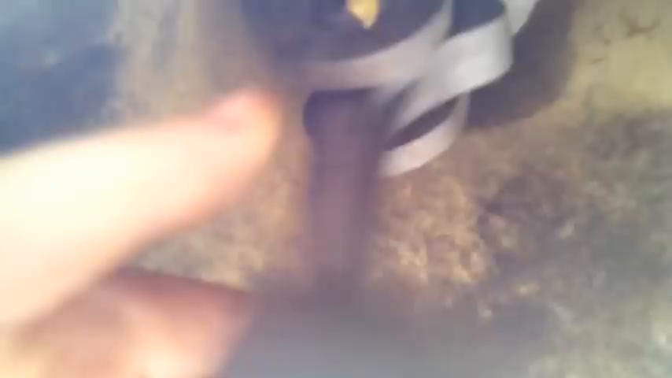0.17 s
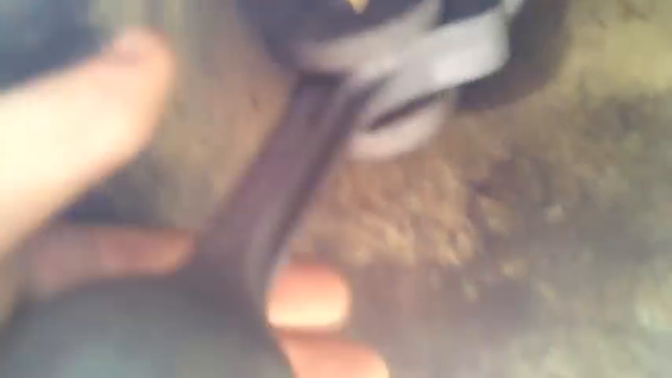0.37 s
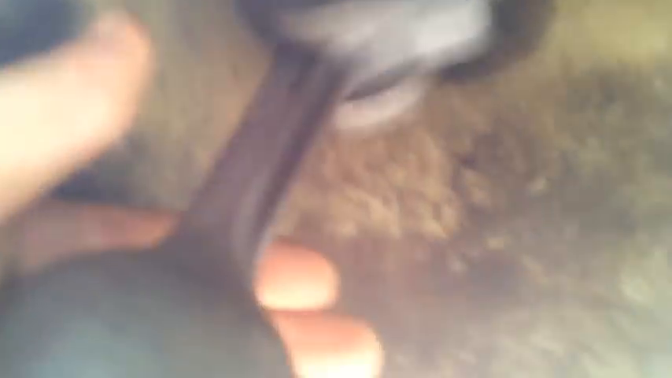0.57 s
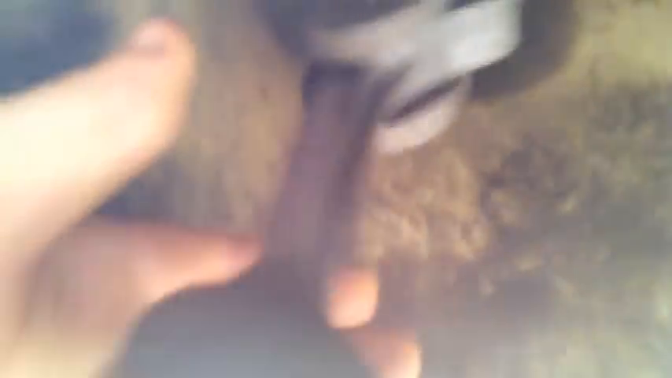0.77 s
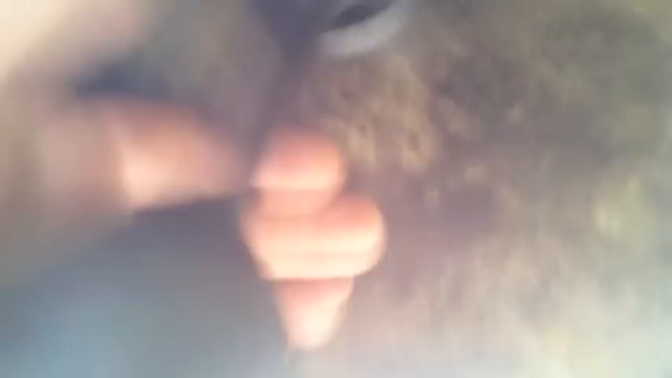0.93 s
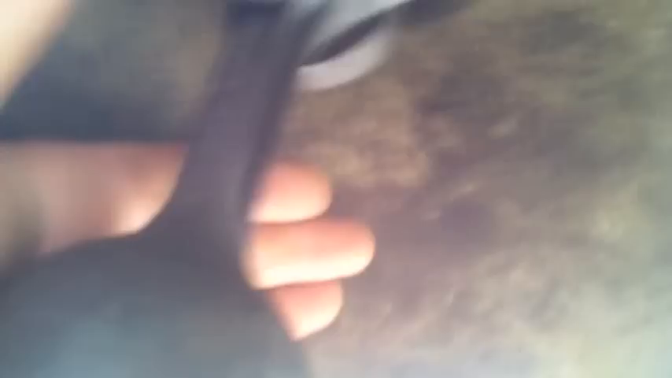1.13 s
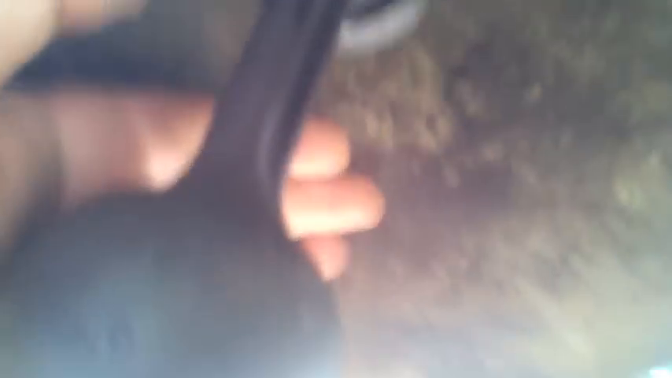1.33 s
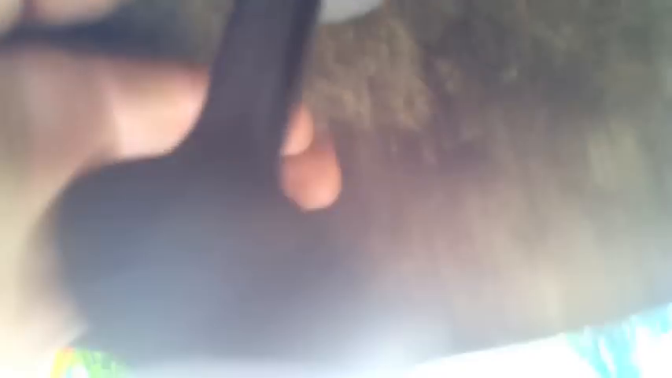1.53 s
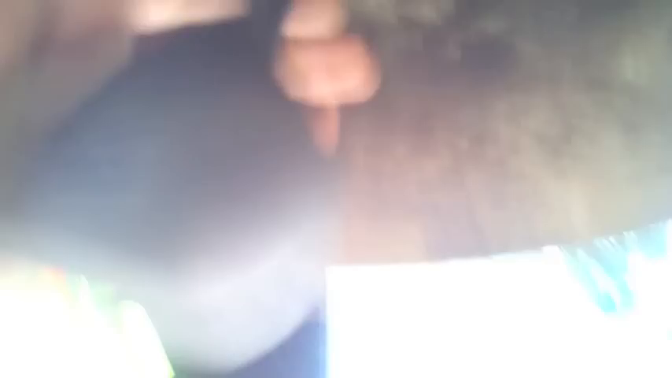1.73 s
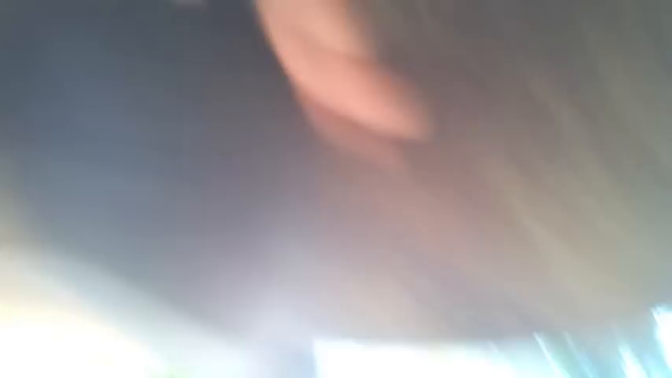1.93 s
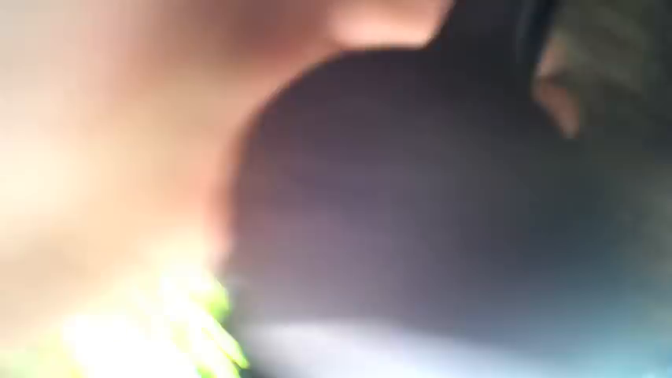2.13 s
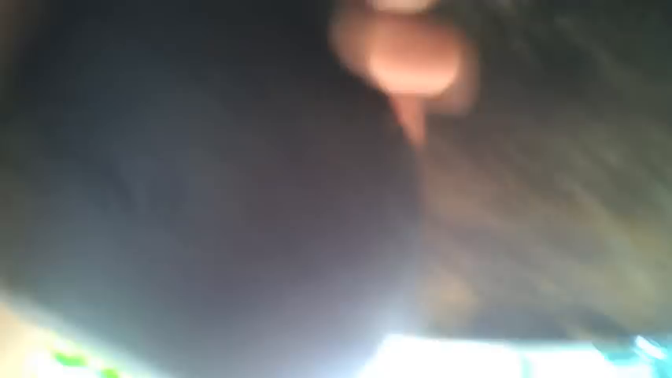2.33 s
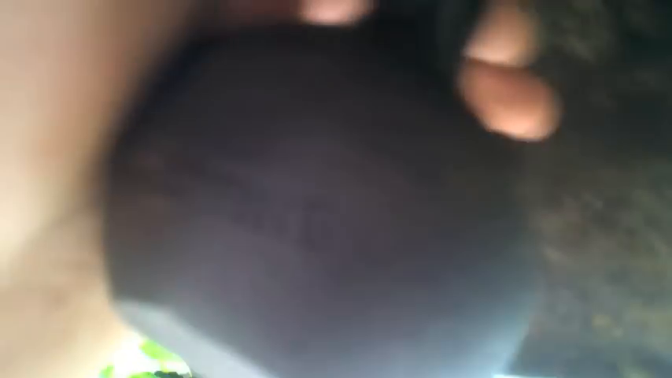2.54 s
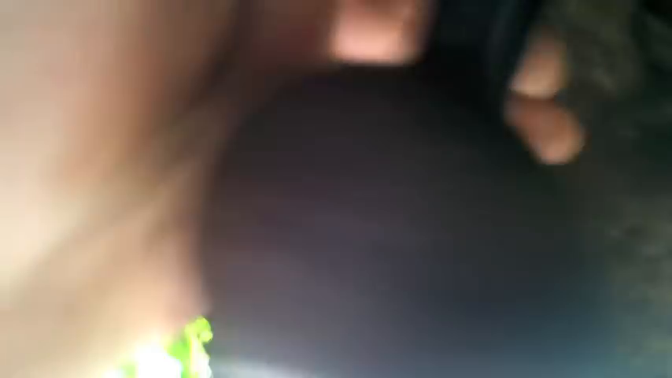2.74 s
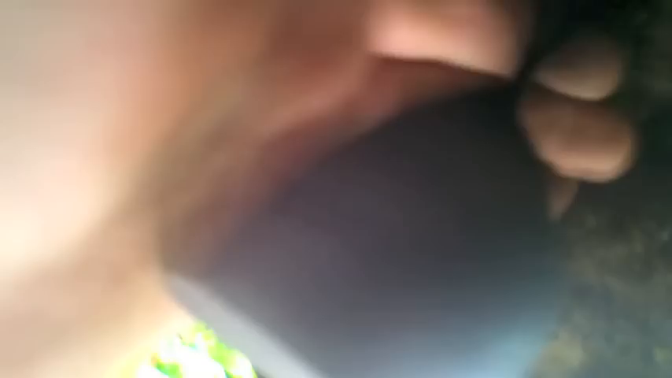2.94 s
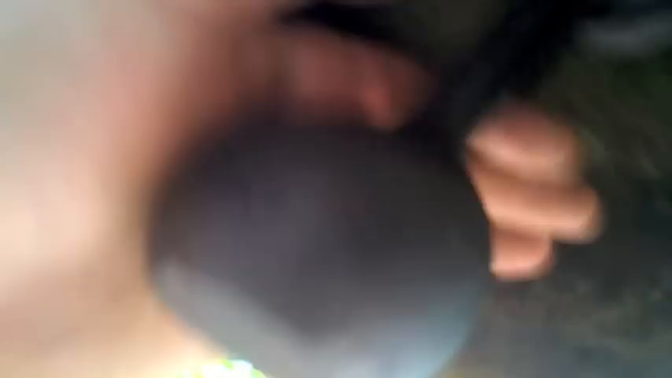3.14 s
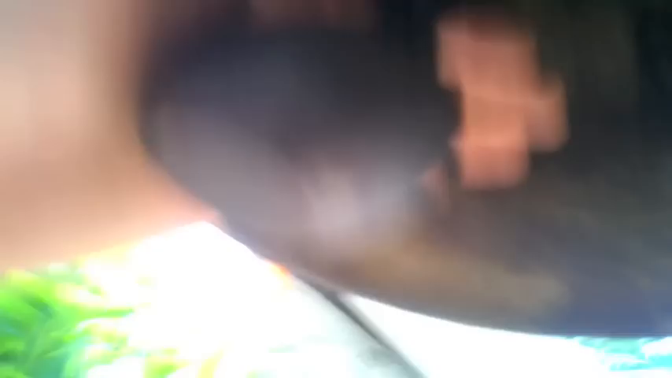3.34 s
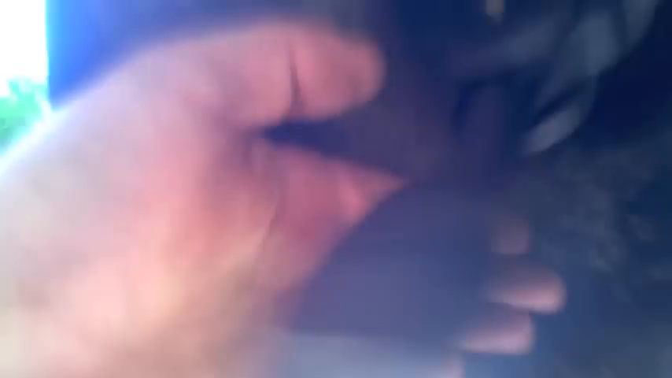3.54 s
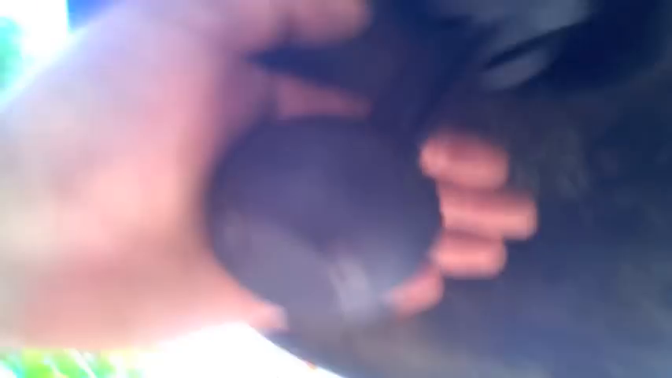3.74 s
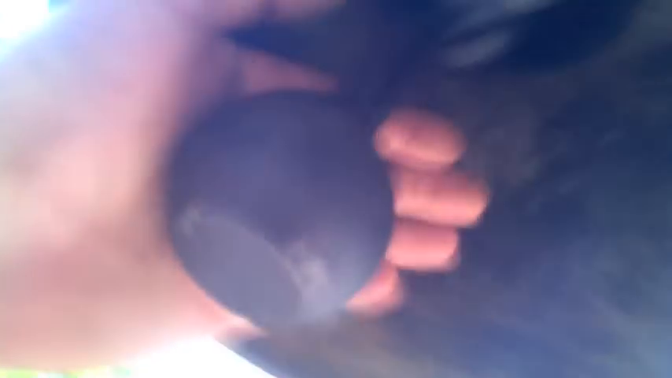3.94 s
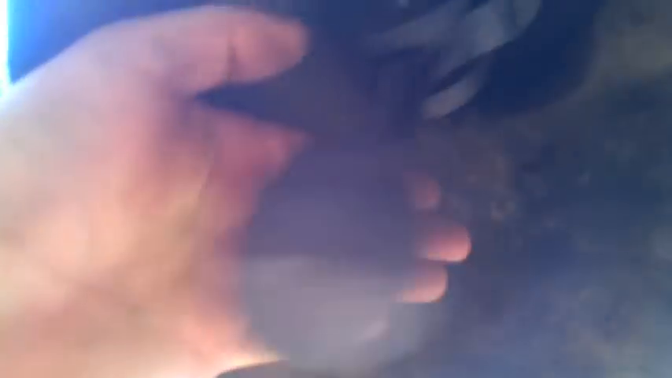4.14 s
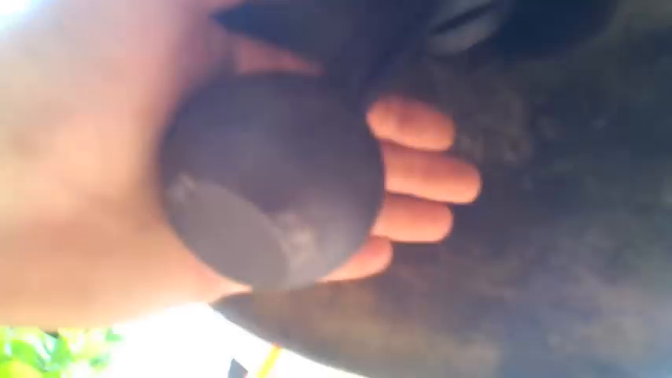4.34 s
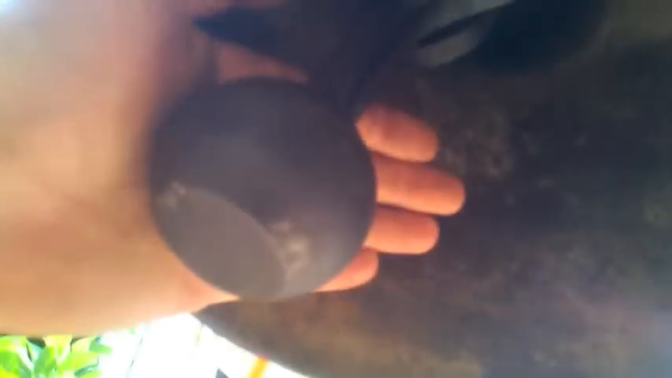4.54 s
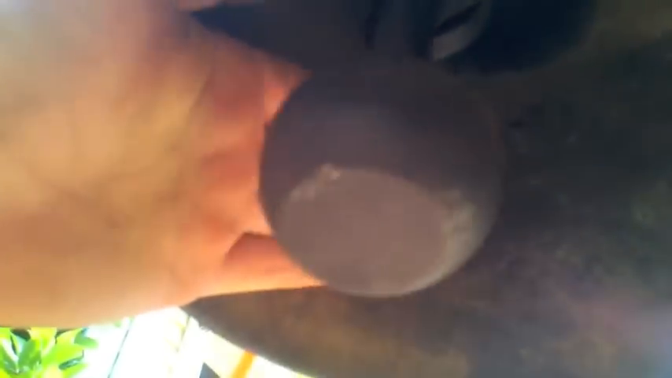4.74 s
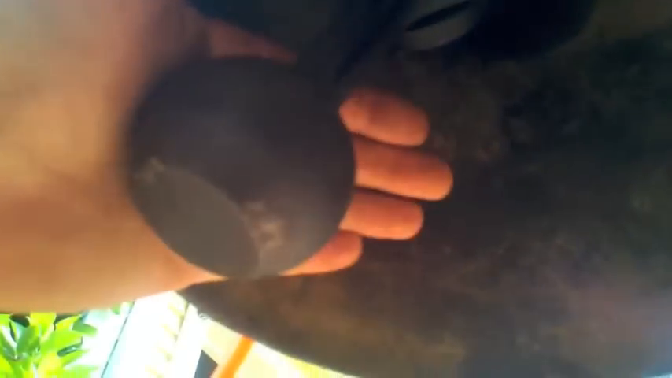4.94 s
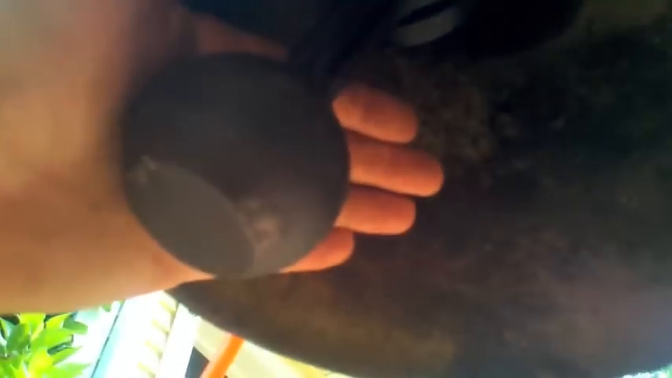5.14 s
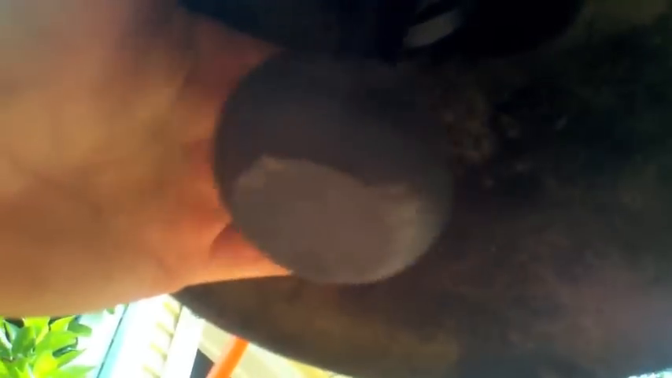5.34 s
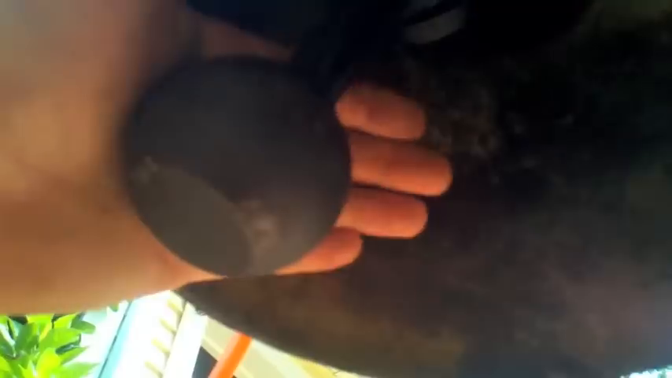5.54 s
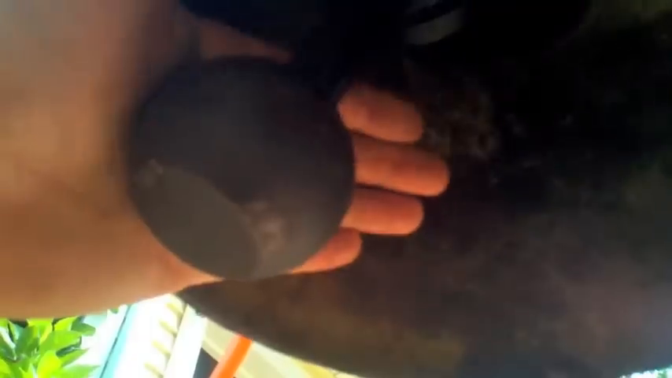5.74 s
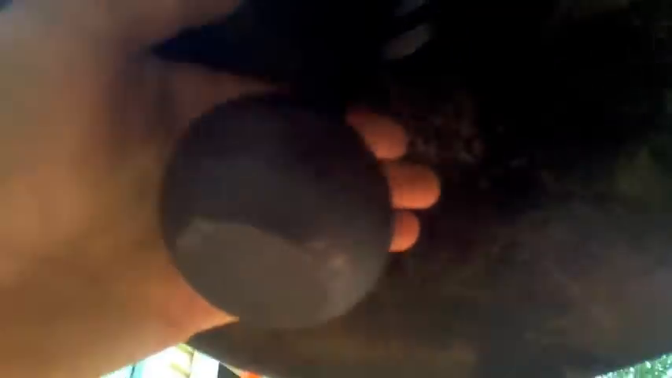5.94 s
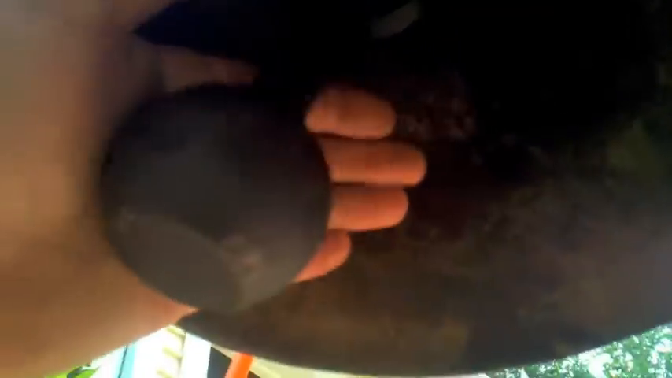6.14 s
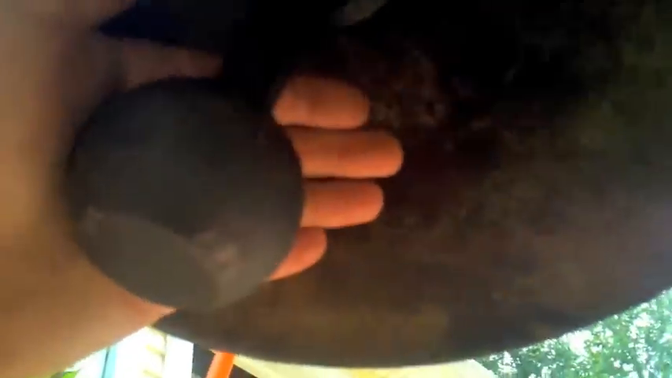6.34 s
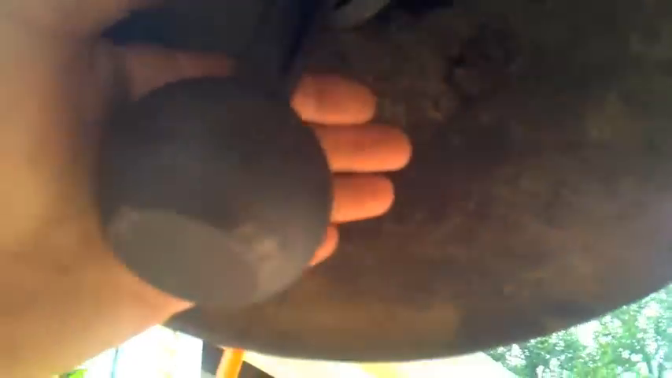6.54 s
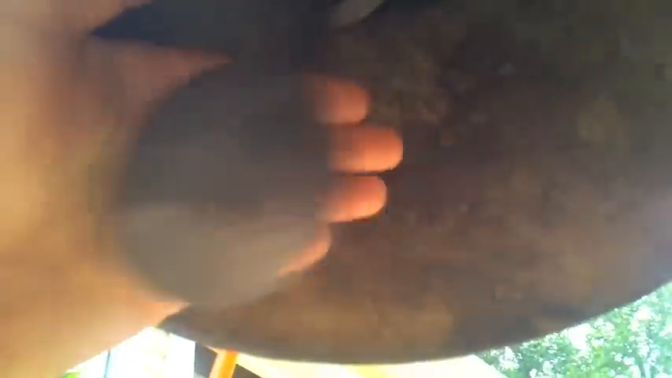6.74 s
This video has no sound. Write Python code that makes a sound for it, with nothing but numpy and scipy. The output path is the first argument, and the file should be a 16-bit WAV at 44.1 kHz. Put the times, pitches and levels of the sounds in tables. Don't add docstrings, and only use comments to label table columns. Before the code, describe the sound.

Regular bright steel clanks about every two-thirds of a second, with lighter rebounds and puffs of air, the bell held silent while a compressor hums behind.

```python
import sys
import numpy as np
from scipy import signal
from scipy.fft import rfft, irfft
from scipy.io import wavfile
from scipy.ndimage import uniform_filter1d, map_coordinates

SR = 44100
rng = np.random.default_rng(int(sys.argv[2]) if len(sys.argv) > 2 else 0)


def ratio(d):
    e = np.asarray(d, float) / 20
    return 10 ** e


def generate_wav(signal):
    frames = np.transpose(np.atleast_2d(signal))
    scaled = np.clip(frames, -1, 1) * 32767
    pcm = np.round(scaled).astype(np.int16)
    wavfile.write(sys.argv[1], SR, pcm)


N = 304284


def drift(rate):
    knots = rng.standard_normal(200)
    return map_coordinates(knots, [np.arange(N) / SR * rate + 3], order=3)


def curve(rows):
    return np.interp(np.arange(N) / SR, *np.transpose(rows))


def add(track, times, pieces):
    for s, piece in zip(times, pieces):
        i = round(s * SR)
        lead = max(-i, 0)
        track[..., i + lead:i + piece.shape[-1]] += piece[..., lead:N - i]


def ports(alike, opposed):
    return np.array([alike + opposed, alike - opposed])


def port_noise(spectrum):
    hz, *levels_db = np.transpose(spectrum)
    grid = np.log(np.fft.rfftfreq(N, 1 / SR) + 1)
    gains = ratio(np.array([np.interp(grid, np.log(hz), db) for db in levels_db]))
    noise = irfft(gains * rfft(rng.standard_normal((2, N))), N)
    pair = ports(*noise)
    return pair / np.std(pair)


# time in seconds, depth [0-1].
MIC_DEPTH = [
    (0, 0.13),
    (2, 0),
    (3.5, 0.31),
    (5.4, .72),
    (6.9, 0.8),
]


def depth_at(s):
    return np.interp(s, *np.transpose(MIC_DEPTH))


def parts(events, table):
    s, force_db = np.transpose(events)[:2]
    rim_db, change_db = np.transpose(table)
    return force_db + rim_db[:, None] + np.outer(change_db, depth_at(s))


def resonate(contacts, hz, width):
    r, w = np.exp(-np.pi * width / SR), 2 * np.pi * hz / SR
    return signal.lfilter([1 - r, 0, r - 1], [1, -2 * r * np.cos(w), r * r], contacts)


def clank(times, levels_db, body, rise, hold, t60, tail_db, tail_t60, habit=0.56, far_db=-9, alike=False, shared=0):
    t = np.arange(round(.2 * SR)) / SR
    fall = ratio(-60 * np.maximum(t - hold, 0) / t60) + ratio(tail_db - 60 * t / tail_t60)
    shape = np.clip(t / rise, 0, 1) ** 2 * fall
    count = len(times) + 1
    uneven_db = 2.5 * rng.standard_normal((count, 2, len(t) // 30)).repeat(30, -1)
    draws = rng.standard_normal((count, 2, len(t))) * ratio(uneven_db)
    contacts = (np.sqrt(habit) * draws[0] + np.sqrt(1 - habit) * draws[1:]) * shape
    strengths = ratio(1.59 * rng.standard_normal((len(times), len(body))))
    pieces = 0
    for k, (hz, width, db) in enumerate(body):
        rung = resonate(contacts, hz, width)
        pieces = pieces + (-1) ** k * ratio(db) * strengths[:, k, None, None] * rung
    pieces /= np.sqrt(np.mean(pieces[..., :550] ** 2, axis=-1, keepdims=True))
    if alike:
        pieces, far_db = pieces[:, [0, 0]], 0
    pieces = pieces * ratio(np.add.outer(levels_db, [0, far_db]))[..., None]
    out = np.zeros((2, N))
    add(out, times, pieces + shared * pieces[:, [0]] * [[0], [1]])
    return out


# level alike at both ports in dB,
# level opposed between the ports in dB, level alike under load in dB.
DRONE = [(-62, -82, -65), (-52, -80, -55.5), (-53.5, -104, -58), (-61, -106, -92), (-55, -167, -56),
         (-69.5, -109, -56.5), (-54, -133, -51.5), (-77, -73, -64), (-58, -117, -59), (-62, -57, -62),
         (-64.5, -72.5, -63.5), (-72, -114, -79), (-64, -103, -67.5), (-73, -94, -62), (-71, -85, -73.5),
         (-57, -69.5, -57.5), (-69, -89, -65.5), (-70.5, -75, -65), (-83.5, -82, -73), (-114, -109, -94),
         (-84, -93, -85), (-92, -83, -71), (-75.5, -85, -79), (-75.5, -80, -79), (-87, -82, -73),
         (-103, -76, -81), (-70.5, -83, -84), (-84, -85, -72), (-73.5, -85, -76), (-60.5, -69, -64)]
# time in seconds, strokes per second [Hz].
STROKES = [
    (0, 44.87),
    (.7, 44.89),
    (1.5, 44.8),
    (2.7, 44.74),
    (3.0, 44.38),
    (3.4, 44.44),
    (3.75, 44.7),
    (5.1, 44.82),
    (6.9, 44.79),
]
# time in seconds, share [0-1].
LOAD = [
    (0, 0.06),
    (2.8, 0.8),
    (3.05, 0.99),
    (3.45, 1),
    (3.65, 0.31),
    (6.9, 0.5),
]
# pitch in Hz, change in dB.
SETTLED = [(400, 1), (520, 4.5), (630, 0), (760, 1.5), (806, -2), (850, 2.5), (895, 14), (1000, 5)]
# time in seconds, level in dB.
WHINE = [
    (0, -0.5),
    (.8, 3.5),
    (1.9, -0.5),
    (2.7, -5),
    (3.9, -10),
    (4.5, -4),
    (6.9, -5),
]
# pitch in Hz, level alike at both ports in dB, level opposed in dB.
MURMUR = [(40, -2, -6), (109, -0.5, -31.5), (383, -4, -2.5), (800, -19.5, -47), (1420, -10.5, -15),
          (1900, -16.5, -12.5), (3120, -16, -18), (4430, -25.5, -25), (5370, -23.5, -28.5),
          (8700, -22, -19), (13850, -17.5, -16.5), (13400, -44, -50)]


def compressor():
    phase, load = 2 * np.pi * np.cumsum(curve(STROKES)) / SR, np.clip(curve(LOAD), 0, 1)
    settled = curve([(3.45, 0), (3.84, 1)])
    out = 0
    for k, (alike_db, opposed_db, loaded_db) in enumerate(DRONE, start=2):
        start, skew = rng.standard_normal(2)
        turn = k * phase + 1.1 * start + .15 * drift(6)
        level_db = alike_db + load * (loaded_db - alike_db)
        level_db = level_db + settled * np.interp(k * STROKES[0][1], *np.transpose(SETTLED))
        if k > len(DRONE):
            level_db = level_db + curve(WHINE)
        alike = ratio(level_db) * np.cos(turn)
        opposed = ratio(opposed_db) * np.sin(turn + 1.9 * skew)
        out = out + ratio(0.33 * drift(2.17) + 0.55 * drift(0.46)) * ports(alike, opposed)
    throb = ratio(0.28 * np.cos(phase) + 0.4 * np.cos(2 * phase) + 0.067 * drift(5.9))
    return out + ratio(-53.5) * throb * port_noise(MURMUR)


# pitch in Hz, level alike at both ports in dB, level opposed in dB.
LEAK = [(3000, -12, -33), (7240, -11, -36), (8700, -29, -28), (10060, 8, -40), (11200, 1, 1),
        (13400, 13, 4)]
# pitch in Hz, level alike at both ports in dB, level opposed in dB.
EXHAUST = [(1080, -4.5, -23), (3220, 5.5, 8), (4000, -16, -10), (6500, -2.5, 3), (7870, 16, 4),
           (9100, 3.5, 1), (13600, -5.5, -1)]


def air():
    early_blow_s, early_release_s, early_leak_db = -.397, -.237, -41
    t = np.arange(N) / SR
    blown = np.r_[early_blow_s, np.array(BLOWS)[:, 0]]
    freed = np.r_[early_release_s, np.array(RELEASES)[:, 0]]
    last = np.searchsorted(freed, t) - 1
    since_blow = t - blown[np.searchsorted(blown, t) - 1]
    since_free = t - freed[last]
    vented = uniform_filter1d((since_free < since_blow) * 1., 300)
    puff_db = np.r_[0, np.array(RELEASES)[:, 1]][last] - 44.5 - 60 * since_free / 1.08
    rest_s, sag_s = 0.14, 0.07
    late = since_free - rest_s
    sag_db = np.where(late < 0, -late / rest_s, 6 * np.expm1(-late / sag_s))
    leak_db = np.r_[early_leak_db, np.array(RELEASES)[:, 2]][last] + sag_db + 0.8 + 1.1 * drift(7.9)
    leak = sum(ratio(0.85 * drift(12) - 4.0) * port_noise(LEAK) for gap in range(2))
    return vented * (ratio(puff_db) * port_noise(EXHAUST) + ratio(leak_db) * leak)


STEEL_HZ = [2089, 3585, 3808, 5176, 5618, 5735, 5886, 6098, 7456, 7665, 8608, 9075, 9398, 9468, 9771, 9995,
            10977, 12010, 12225, 12441, 13033, 13146]
# strength in dB, time to fall by 60 dB in seconds.
STEEL = [(-55.5, 0.79), (-41.5, 2.43), (-51, 0.69), (-52, 0.25), (-60, 0.55), (-48, 0.78), (-24.5, 0.24),
         (-37, 4.9), (-50, 1.6), (-20.5, 0.54), (-40, 0.11), (-45.5, 1.2), (-51, 0.26), (-38.5, 1.3),
         (-62, 0.46), (-65, 1), (-41.5, 0.99), (-35, 0.67), (-46, 0.54), (-41, 0.58), (-58, 0.35),
         (-48, 1.9)]
RING_HZ = [3585, 6000, 7666, 9430, 12010]
# level at the rim in dB, change at full depth in dB.
RING_PARTS = [
    (-3, -11),
    (-5, -7.5),
    (1.5, -2.2),
    (-2.5, -8),
]
# pitch in Hz, change in dB.
RELEASE_DAMP = [(5000, -16), (6100, -4), (7600, -18), (9400, -2), (12000, -20)]


def steel():
    t = np.arange(round(.9 * SR)) / SR
    struck = np.array([(-0.26, 0, 0, 0, 0)] + list(BLOWS))
    rows = np.c_[struck[:, 0] + .001, struck[:, 3], parts(struck, RING_PARTS).T]
    pushes_db = np.r_[3, np.transpose(RELEASES)[3]]
    bounced, released = np.clip((t - .071) / .008, 0, 1), np.clip((t - .16) / .02, 0, 1)
    free_s = np.maximum(t - .16, 0)
    onset = np.clip(t / 0.035, 0, 1)
    chance = rng.standard_normal((len(rows), len(STEEL), 3))
    pieces = np.zeros((len(rows), 2, len(t)))
    for k, (hz, (db, t60)) in enumerate(zip(STEEL_HZ, STEEL)):
        if hz < 4000:
            decay_db = -60 * t / t60 - 45 * free_s
        else:
            damp_db = np.interp(hz, *np.transpose(RELEASE_DAMP))
            decay_db = -60 * t / t60 - 6 * bounced - 100 * free_s + damp_db * released
        swing = ratio(db + decay_db) * onset * np.exp(2j * np.pi * hz * t)
        anchored = min(abs(hz - np.array(RING_HZ))) < 120
        luck_db = .6 if anchored else 3.5
        for row, piece, (luck, near, far), push_db in zip(rows, pieces, chance[:, k], pushes_db):
            share_db = np.interp(hz, RING_HZ, row[1:]) + luck_db * luck
            if hz == RING_HZ[0]:
                grip_db = 70 * depth_at(row[0]) * np.maximum(t - 0.25, 0)
                share_db = share_db + bounced + push_db * released - grip_db
            turns = [np.exp(9j * near), 0.36 * np.exp(9j * near + 1j * far)]
            piece += ratio(share_db) * np.real(np.outer(turns, swing))
    out = np.zeros((2, N))
    add(out, rows[:, 0], pieces)
    return out


def ticks():
    s = np.transpose(BLOWS)[0] - .009
    level_db = -38.5 + 9 * rng.standard_normal(len(s))
    return clank(s, level_db, RELEASE_BODY[2][2:], 0.00029, 0.0011, 0.039, -18, 0.064)


# pitch in Hz, width in Hz, level in dB.
HOLLOW = [(385, 35.5, 14.5), (534, 79, -2.5)]


def piston(events, levels, body, rise, hold, t60, tail_db):
    hollow_db, clack_db, clink_db, crack_db = parts(events, levels)
    clack, clink, crack = body
    s = np.transpose(events)[0] - 0.45 * rise
    return (clank(s, hollow_db - 2.5, HOLLOW, rise, hold, t60, -28, 0.046, alike=True)
            + clank(s, clack_db, clack, rise, hold + 0.00079, t60, tail_db + 47, 0.087)
            + clank(s, clink_db - 2.5, clink, rise, hold, t60, tail_db, 0.047)
            + clank(s, crack_db, crack, rise, hold, t60, tail_db - 4, 0.092))


# start in seconds, force in dB, level of the leak that follows in dB,
# push given to the low ring in dB.
RELEASES = [(0.4104, -0.5, -37, 6), (1.0609, 0, -38, 4.5), (1.7059, -1.5, -43, 5),
            (2.354, -1.5, -43.5, -1.5), (3.0044, -1, -43, -6.5), (3.6485, -0.5, -41, -1.5),
            (4.2946, -2, -42, 3), (4.943, -1, -42.5, 2), (5.5921, -1.5, -43.5, 3.2), (6.2407, -2.5, -42, 7),
            (6.8867, -1, -41, .1)]
# level at the rim in dB, change at full depth in dB.
RELEASE_PARTS = [
    (-49.5, 11.5),
    (-37, -1.5),
    (-25, -3.5),
    (-24, 1.8),
]
# pitch in Hz, width in Hz, level in dB.
RELEASE_BODY = [
    [(770, 860, -10.5), (1218, 124, 3.5), (1800, 270, -10.5), (2210, 33, 7.5)],
    [(2870, 360, -0.5), (3070, 860, -5), (3700, 210, -6), (4000, 140, -16), (5370, 140, -8)],
    [(6220, 720, -4), (7360, 740, 4), (8280, 1740, 0.5), (10560, 950, 2.5), (13100, 2060, -2), (14300, 300, 9)],
]


def releases():
    return piston(RELEASES, RELEASE_PARTS, RELEASE_BODY, rise=0.0024, hold=0.011, t60=0.04, tail_db=-35)


# start in seconds, force in dB.
BOUNCES = [(0.3213, -1.5), (0.9722, -4.5), (1.62, 0), (2.2688, 1), (2.9182, 0), (3.5645, 1), (4.2115, -1),
           (4.8595, 0), (5.5087, -2.5), (6.1568, -0.5), (6.8018, -1)]
# level at the rim in dB, change at full depth in dB.
BOUNCE_PARTS = [
    (-41.5, 4),
    (-38.5, -6),
    (-32, -3.5),
    (-31, 5),
]
# pitch in Hz, width in Hz, level in dB.
BOUNCE_BODY = [
    [(1151, 58, 4.5), (1670, 360, -5)],
    [(3020, 680, -10), (3720, 220, -15), (4206, 200, 9), (5450, 180, 0)],
    [(6000, 1100, -8), (7570, 280, 3), (9360, 1000, -1), (10800, 210, 9.5), (12300, 890, -8.5), (13100, 600, -22)],
]


def bounces():
    return piston(BOUNCES, BOUNCE_PARTS, BOUNCE_BODY, rise=0.0017, hold=0.0034, t60=0.024, tail_db=0)


# start in seconds, force in dB, thud through the hand in dB,
# low ring left free in dB, knock against the palm in dB.
BLOWS = [(0.25, 2.5, -27, -1.5, 2), (0.899, 1, -26.5, -1, 5.5), (1.5465, -0.5, -18.5, -4, 3),
         (2.193, 1, -24.5, 5.5, -0.5), (2.8415, 1, -22.5, 8.5, -3.5), (3.4895, 0.5, -37.5, -2, -1),
         (4.136, .5, -29.5, -7, -1), (4.7838, 1.5, -27.5, -2, -2.5), (5.4323, 0.5, -31, -2.5, 2.5),
         (6.0804, -1, -22.5, -8, -1), (6.727, -1, -22, -5, -1.5)]
# level at the rim in dB, change at full depth in dB.
BLOW_PARTS = [
    (-28.5, 2),
    (-41, 3),
    (-25.5, -5),
    (-19.5, -0.5),
    (-14, 0.4),
]
# pitch in Hz, width in Hz, level in dB.
THUD = [(58.6, 64, -3.5), (125, 98, 2.5), (222, 144, 1.5)]
# pitch in Hz, width in Hz, level in dB.
KNOCK = [(378, 380, 7.5), (634, 22, 2.3), (722, 550, 1.3)]
# pitch in Hz, width in Hz, level in dB.
CLACK = [(1275.5, 33, 6), (1562, 220, -3.5), (1835, 72, -6.5), (2010, 250, -8.5)]
# pitch in Hz, width in Hz, level in dB.
CLINK = [(2600, 100, -6), (2952, 58, -0.5), (3210, 190, -11.5), (3617, 80, 0.5), (4160, 160, -14.5),
         (4980, 450, -3), (4975, 1080, -11)]
# pitch in Hz, width in Hz, level in dB.
CRACK = [(5885, 71, -8.5), (6835, 37, -8), (7554, 142, -3.5), (8690, 540, -21), (9275, 60, 5),
         (9440, 660, -7.5), (10660, 910, -15), (12700, 240, -9), (12840, 180, -33), (14030, 400, -3.5)]


def blows():
    s, force_db, thud_db, ring_db, palm_db = np.transpose(BLOWS)
    knock_db, hollow_db, clack_db, clink_db, crack_db = parts(BLOWS, BLOW_PARTS)
    rise = .0009
    return (clank(s, thud_db + 0.5, THUD, 0.0017, 0.002, 0.0092, -17, 0.08, habit=0.86, far_db=-14.5)
            + clank(s, knock_db + palm_db, KNOCK, 0.0015, 0.0036, 0.0068, -12.5, 0.13, habit=0.09, far_db=-14)
            + clank(s, hollow_db, HOLLOW, 0.0012, 0.0007, 0.0057, 8, 0.1, habit=0.63, alike=True)
            + clank(s, clack_db, CLACK, rise, 0.0026, 0.013, -10, .14, habit=0.077)
            + clank(s, clink_db, CLINK, rise, 0.0038, 0.019, -9, 0.15, habit=0.12)
            + clank(s, crack_db, CRACK, rise, 0.0086, 0.015, -9, 0.15, habit=0.48, shared=0.19))


def scene():
    return compressor() + air() + steel() + ticks() + releases() + bounces() + blows()


def low_pass(x):
    return signal.sosfilt(signal.butter(12, 15200, fs=SR, output="sos"), x)


def record(dry):
    lag = 17
    edge = np.convolve([-.5, 1, -.5], [-.5, 1, -.5])
    dull = np.eye(5)[2] - 0.12 * edge
    other = np.pad(dry, ((0, 0), (lag - 2, 0)))[::-1, :N]
    late = signal.lfilter(dull, [1], other)
    full = np.clip((dry - late) * ratio([[-.25], [.15]]), -1, 1)
    cut = signal.sosfilt(signal.cheby2(12, 45, 14200, fs=SR, output="sos"), full)
    return low_pass(np.clip(cut, -1, 1))


dry = scene()
out = record(dry)
generate_wav(out)
```